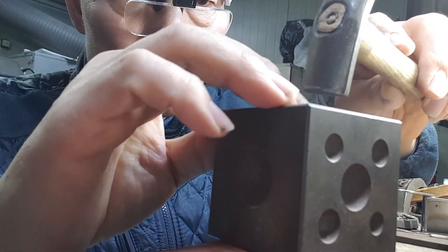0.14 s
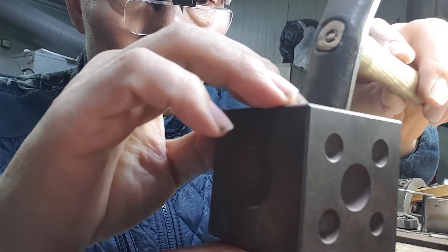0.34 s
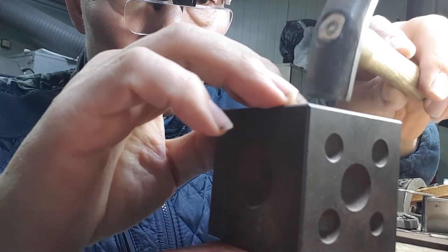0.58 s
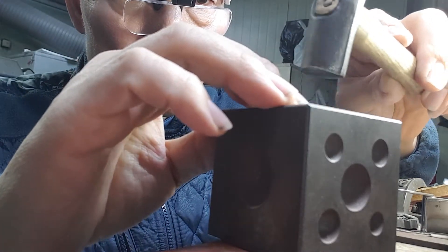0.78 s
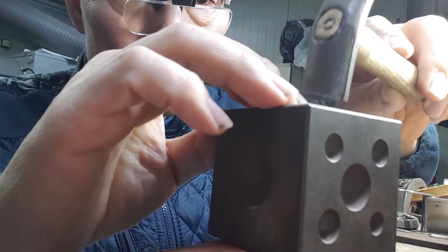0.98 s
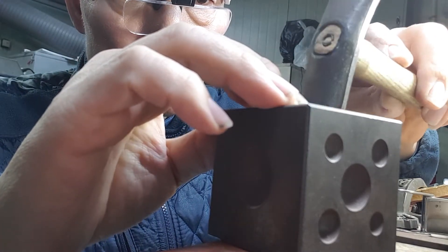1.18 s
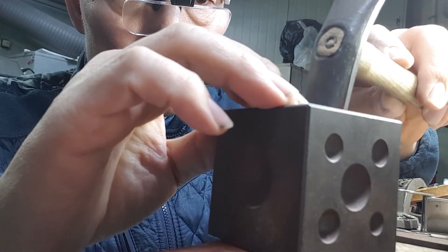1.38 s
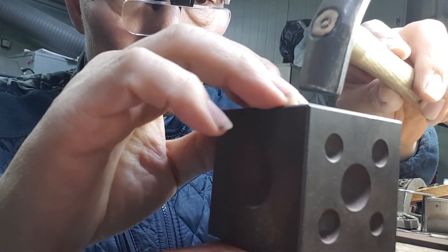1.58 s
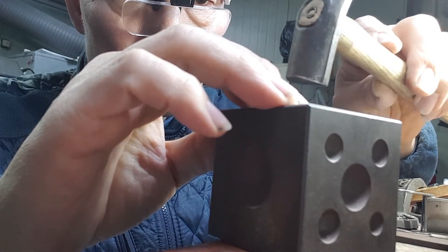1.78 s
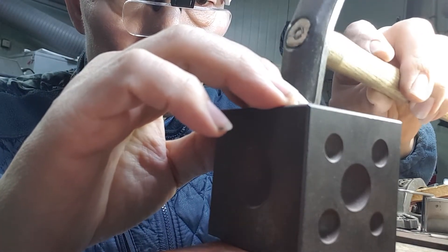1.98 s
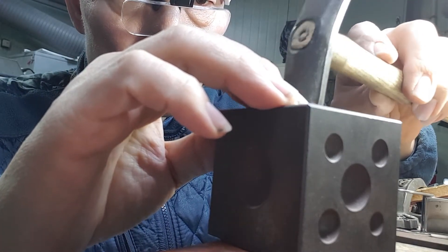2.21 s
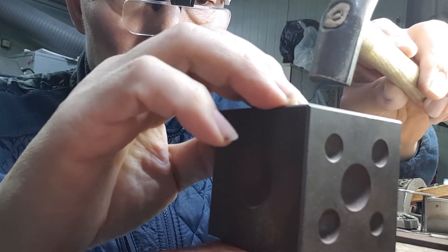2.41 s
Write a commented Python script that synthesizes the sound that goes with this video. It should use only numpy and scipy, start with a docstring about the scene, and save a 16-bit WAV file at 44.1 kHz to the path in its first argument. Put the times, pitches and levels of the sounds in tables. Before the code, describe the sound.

Light hammer taps on metal against a steel block come eight in a row, about four a second, the last softer. They sound close and to the right, each ringing briefly, with a short workshop echo and faint low rumble.

```python
"""Hammer taps on a steel block

A small steel hammer taps a ring on a steel block, close to the right microphone of a phone on the
same bench. Each of the eight taps is a blunt knock with a bright crack; block, hammer and bench ring
briefly and the workshop answers. Behind them are faint scuffs, a low wavering rumble and thin hiss."""
import sys
import numpy as np
from scipy import signal
from scipy.fft import rfft, irfft
from scipy.io import wavfile
from scipy.ndimage import uniform_filter1d

SR = 44100
rng = np.random.default_rng(int(sys.argv[2]) if len(sys.argv) > 2 else 0)


def master_out(mix):
    """Clip the mix to full scale and print it as 16-bit PCM to the path in sys.argv[1]."""
    frames = np.transpose(np.atleast_2d(mix))
    ceiling = np.clip(frames, -1, 1)
    pcm = np.round(ceiling * 32767).astype(np.int16)
    wavfile.write(sys.argv[1], SR, pcm)


N = 108045
PUSH_S = .00064  # how long the hammer's landing lasts


# Each row: time in seconds, then levels in dB: knock, bench and room, crack, four rings from low to high.
HAMMER_TAPS = [(0.3418, 0.0066, -1, -19, -28, -25.5, -20, -24), (0.6084, 0, 0, -16, -28, -23.5, -19, -27),
               (.87252, 0.018, 2, -17.5, -41.5, -27.5, -34.5, -39),
               (1.134, 0, 0, -17, -27, -26.5, -30.5, -37),
               (1.3899, 0.026, 0.5, -17.5, -28.5, -27, -37, -33),
               (1.62998, 0.017, -2, -18, -23, -26.5, -33.5, -31),
               (1.8709, 0, 0, -16.5, -42, -25.5, -26.5, -46.5),
               (2.11757, 0, -4.5, -22.5, -37, -33.5, -36, -40.5)]

def taps():
    """The hammer lands close on the right; its sound reaches the left microphone a moment later."""
    out, size = np.zeros((2, N + SR)), 16384
    lag_s, treble_delay_s, treble_rise_s = stereo(.00011, 0), .0006, .0012
    elapsed = np.arange(size) / SR
    shared_bands = room_bands(elapsed)[1]
    for when, knock_db, body_db, crack_db, *rings_db in HAMMER_TAPS:
        start = int((when - PUSH_S / 2) * SR)
        t = elapsed + start / SR - when + PUSH_S / 2 - lag_s
        wobble = bench(t)
        late = t - treble_delay_s
        treble = (crack(late, crack_db) + steel(late, rings_db)) * np.clip(late / treble_rise_s, 0, 1)
        body = wobble + room(elapsed, shared_bands, crack_db)
        out[:, start:start + size] += undb(knock_db) * knock(t) + treble + undb(body_db) * body
    return out[:, :N]


def landing(t):
    """A short dip of pressure as the steel lands."""
    return -np.abs(np.sin(np.pi * np.clip(t / PUSH_S, 0, 1))) ** 1.43


# Things near the block. Each row: delay in seconds, left and right level in dB against the landing.
NEAR_ECHOES = [(.0032, -30.5, -44.5), (.0053, -27.5, -11), (0.012, -19.5, -12.5), (0.015, -22.5, -13.5)]

def knock(t):
    """The landing, a longer and flatter rebound, and echoes of the landing from things nearby."""
    rebound_s = .0012
    rebound = undb(-6) * np.sin(np.pi * np.clip((t - PUSH_S) / rebound_s, 0, 1)) ** .5
    echoes = sum(undb(stereo(left, right)) * landing(t - delay) for delay, left, right in NEAR_ECHOES)
    return (landing(t) + rebound) * undb(stereo(-17, 0)) + echoes


# The crack from close up. Each row: frequency in Hz, relative level in dB.
CRACK_SPECTRUM = [(880, -27.5), (1500, 9), (2610, -1), (3880, -8.5), (5120, -1), (6060, -3.5), (7690, 0.5),
                  (8400, -10), (9650, -15), (10200, -10.5), (13000, -17), (16000, -21.5)]

def crack(t, db):
    """The bright noise of the impact: a sharp tick on top of a short burst."""
    grit = unit(coloured(lambda f: undb(read(CRACK_SPECTRUM, f)) * (f > 1200), t.shape[1], channels=2))
    return undb(stereo(db - 8, db)) * grit * (fade(t, t60=.035) + undb(-3) * fade(t, t60=.004))


# Block and hammer. Each row: frequency and width in Hz, the burst's T60 in seconds and left offset in dB,
# then the lingering part's relative level in dB, T60 in seconds and left offset in dB.
STEEL_RINGS = [(5250, 700, .03, -3, -20, .33, 3), (6500, 500, .03, -8, -24, .35, 0),
               (7720, 350, .03, -11, -22, .28, 4), (12670, 30, .025, -10, -9, .16, -10)]
# Two brief upper modes. Each row: frequency in Hz, level in dB against the third ring, T60 in seconds.
UPPER_MODES = [(10480, -11, .05), (11790, -14, .035)]

def steel(t, levels_db):
    """Each ring is a cluster of close modes: a quick burst, then a weaker part that lingers."""
    out = 0
    for db, (hz, width, t60, left_db, late_db, late_t60, late_left_db) in zip(levels_db, STEEL_RINGS):
        ring = unit(coloured(lambda f: peak(f, hz, width), t.shape[1], channels=3))
        ring = ring / np.sqrt(uniform_filter1d(ring ** 2, size=1024) + 0.3)  # evens out the beating
        burst = undb(stereo(left_db, 0)) * fade(t, t60) * ring[0]
        lingering = undb(late_db + stereo(late_left_db, 0)) * fade(t, late_t60) * ring[1:]
        out += undb(db) * (burst + lingering)
    for hz, db, t60 in UPPER_MODES:
        tone = np.sin(2 * np.pi * hz * t + 6 * rng.random((2, 1)))
        out += undb(levels_db[2] + db + stereo(-6, 0)) * fade(t, t60) * tone
    return out


# The bench under the phone and the air around it.
# Each row: frequency in Hz, delay in seconds, relative left and right level in dB, T60 in seconds.
BENCH_MODES = [(109.4, 0.0047, -39, -29.5, 0.14), (122.6, 0.01103, -46.5, -28.5, 0.22),
               (151, 0.0085, -28, -25, 0.34), (185.6, .01, -23, -26, 0.15), (204.6, .0102, -26, -24, 0.21),
               (218, 0.0026, -34.5, -35.5, 0.12), (409.2, 0.0029, -37, -45.5, 0.23),
               (499.4, .004, -30, -30, 0.085), (553, 0.00341, -41.5, -33, 0.21),
               (753.8, .002, -35.5, -28, 0.11), (973, 0.003242, -44, -27.5, 0.12),
               (1115, .002, -31, -35, 0.063), (1245, 0.0018, -39.5, -30, 0.11),
               (1620, .002, -28.5, -21, 0.025)]

def bench(t):
    """Each tap lands on a slightly new spot, so the modes shift a little in level and pitch."""
    spread_db, spread_detune, swell_s = 1.5, .006, .039
    spot = rng.standard_normal((len(BENCH_MODES), 2)) * [spread_db, spread_detune]
    out = 0
    for (hz, delay, left, right, t60), (db, detune) in zip(BENCH_MODES, spot):
        age = t - delay
        # The workshop's air modes take time to build.
        swell = 1 - np.exp(-np.maximum(age, 0) / swell_s) if 140 < hz < 210 else 1
        tone = np.sin(2 * np.pi * hz * (1 + detune) * age)
        out -= undb(stereo(left, right) + db) * fade(age, t60) * swell * tone
    return out


# The workshop's answer, heard from the bench. Each row: frequency in Hz, relative level in dB.
ROOM_SPECTRUM = [(240, -10.5), (290, -20.5), (400, -5), (560, -12.5), (750, -18), (1000, -21), (1500, -26),
                 (2500, -30), (3100, -33), (3800, -35.5), (4600, -30), (6000, -31.5), (7800, -28),
                 (8600, -36), (11000, -41.5), (13500, -49.5), (16000, -48)]
# Each row: frequency in Hz, level at the left microphone in dB against the right.
ROOM_BALANCE = [(100, 14.5), (400, -5.5), (1000, -5), (2200, 0.5), (4000, 2), (10000, 4.5), (15000, 0)]
# Each row: frequency in Hz, T60 in seconds.
ROOM_DECAY = [(100, 0.45), (250, 0.28), (600, 0.26), (1500, .35), (4000, 0.3), (8000, 0.14), (15000, 0.35)]

def room_bands(t):
    """Reverberation as third-octave bands of noise, each dying at its own rate."""
    f, spectra = mic_pair(lambda f: undb(read(ROOM_SPECTRUM, f)) * (f > 235), ROOM_BALANCE, len(t))
    centres = 90 * 2 ** (np.arange(23) / 3)
    bands = []
    for hz in centres:
        share = np.clip(1 - abs(3 * np.log2(np.maximum(f, 1) / hz)), 0, 1)
        bands.append(irfft(spectra * share, len(t)) * fade(t, read(ROOM_DECAY, hz)))
    return centres, np.array(bands)


def room(t, shared_bands, crack_db):
    """The workshop answers: the low part repeats from tap to tap, the treble is new each time."""
    same_below_hz, build_s = 3400, .0013
    hz, fresh_bands = room_bands(t)
    same = (1 / (1 + (hz / same_below_hz) ** 2))[:, None, None]
    bright = undb(1.5 * (crack_db + 15.5))  # a sharper crack leaves more treble in the room
    tail = (np.sqrt(same) * shared_bands + bright * np.sqrt(1 - same) * fresh_bands).sum(axis=0)
    return undb(-27) * tail * (1 - np.exp(-t / build_s))


# Faint scuffs around the taps. Each row: midpoint in seconds, length in seconds, level in dB.
SOFT_RUBS = [(0.806, 0.12, -65.5), (1.566, 0.048, -73.5), (1.843, 0.088, -71.5), (2.409, 0.023, -90)]

def scuffs():
    """Soft rubs with two broad treble peaks, each swelling and fading."""
    t = np.arange(N) / SR
    rub = unit(coloured(lambda f: peak(f, 2400, 800) + 1.1 * peak(f, 5200, 1800), N, channels=2))
    return rub * sum(undb(db) * np.exp(-2 * ((t - mid) / (span / 2)) ** 2) for mid, span, db in SOFT_RUBS)


# Rumble at the bench. Each row: frequency in Hz, width in Hz, relative level in dB.
RUMBLE_BANDS = [(45.7, 25, -18.5), (69.2, 6.7, 6), (93.8, 8.4, -2), (146, 5.7, -21.5), (218.2, 8.5, -19)]
# Each row: time in seconds, level in dB.
RUMBLE_LEVELS = [(0, -35.5), (.15, -43), (0.251, -33), (.31, -42), (0.599, -45.5), (.85, -59.5),
                 (0.999, -45), (1.199, -49.5), (1.4, -43), (1.6, -52), (1.801, -51.5), (2.1, -42),
                 (2.45, -51)]

def rumble():
    """Narrow low bands of noise that swell and sink, nearly the same at both microphones."""
    def gain(f):
        return sum(undb(db) * peak(f, hz, width) for hz, width, db in RUMBLE_BANDS)
    mid, side = unit(coloured(gain, N, channels=2))
    times, levels_db = np.array(RUMBLE_LEVELS).T
    return undb(np.interp(np.arange(N) / SR, times, levels_db)) * (mid + side * stereo(.13, -.13))


# Room tone at the bench. Each row: frequency in Hz, relative level in dB.
AIR_SPECTRUM = [(15, -67), (25, -37), (48, -3), (76, 0), (102, -9.5), (120, -39.5), (161, -45.5),
                (212, -38.5), (249, -36), (277, -40.5), (575, -52.5), (818, -45), (1610, -67), (4740, -81),
                (7110, -54.5), (8590, -76), (16000, -74.5)]
# Each row: frequency in Hz, level at the left microphone in dB against the right.
AIR_BALANCE = [(100, 7), (300, -2.5), (700, -4), (1300, 0.5), (2400, 1), (4400, 0.5), (7200, -12.5),
               (10000, -2.5), (15000, -0.5)]

def air():
    """Steady workshop noise; the band of hiss sits on the right."""
    _, spectra = mic_pair(lambda f: undb(read(AIR_SPECTRUM, f)) * (f > 110), AIR_BALANCE, N)
    return undb(-63) * irfft(spectra, N)


def mic_pair(gain, balance, size, alike_below_hz=280):
    """Frequencies and spectra of noise at two microphones: alike in the bass, unrelated higher up."""
    f = np.fft.rfftfreq(size, 1 / SR)
    right, other = rfft(unit(coloured(gain, size, channels=2)))
    alike = 1 / (1 + (f / alike_below_hz) ** 2)
    left = (alike * right + np.sqrt(1 - alike ** 2) * other) * undb(read(balance, f))
    return f, np.array([left, right])


def coloured(gain, size, channels):
    """Noise whose amplitude spectrum is gain(Hz)."""
    return irfft(rfft(rng.standard_normal((channels, size))) * gain(np.fft.rfftfreq(size, 1 / SR)), size)


def peak(f, hz, width):
    """A resonance curve, width Hz across at half height."""
    return 1 / (1 + (2 * (f - hz) / width) ** 2)


def fade(t, t60):
    """Silent before t = 0, then falling 60 dB every t60 seconds."""
    return (t >= 0) * np.exp(-np.log(1000) * np.maximum(t, 0) / t60)


def read(table, hz):
    """Value of a (Hz, value) table on a log frequency axis."""
    table = np.array(table, float)
    return np.interp(np.log(np.maximum(hz, 1)), np.log(table[:, 0]), table[:, 1])


def stereo(left, right):
    return np.array([[left], [right]])


def undb(db):
    return 10 ** (np.asarray(db, float) / 20)


def unit(x):
    return x / np.sqrt(np.mean(x ** 2))


def scene():
    """Close taps over the quiet workshop."""
    return taps() + scuffs() + air() + rumble()


def record(dry):
    """The phone on the bench thins the deepest bass, rounds the peaks and cuts the top."""
    low_cut_hz, drive, top_hz = 50, 1.4, 15550
    thin = signal.sosfilt(signal.butter(2, low_cut_hz, "high", fs=SR, output="sos"), dry)
    rounded = np.tanh(drive * thin) / np.tanh(drive)
    return signal.sosfilt(signal.ellip(8, .2, 70, top_hz, fs=SR, output="sos"), rounded)


dry = scene()
out = record(dry)
master_out(out)
```